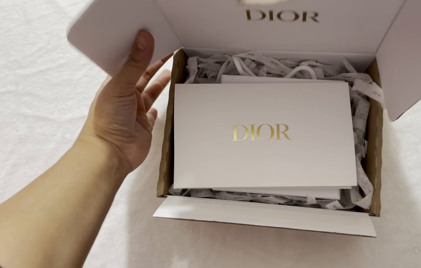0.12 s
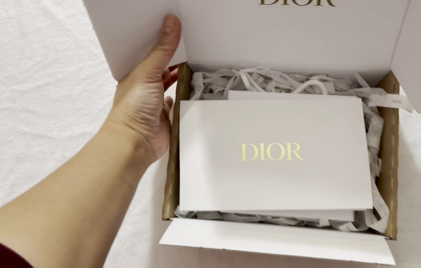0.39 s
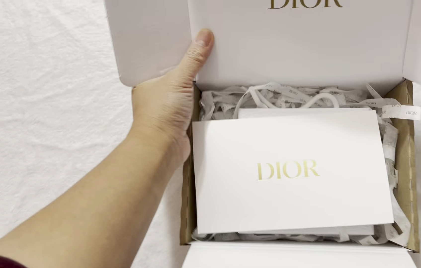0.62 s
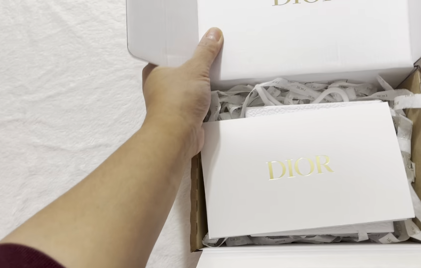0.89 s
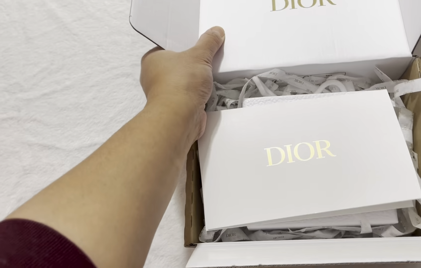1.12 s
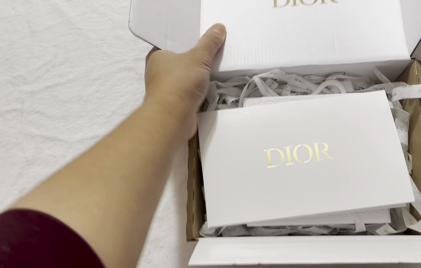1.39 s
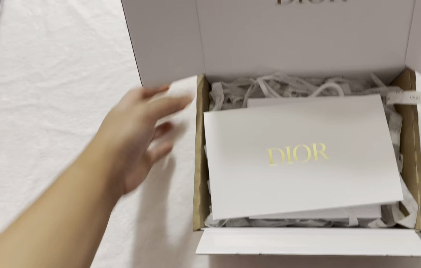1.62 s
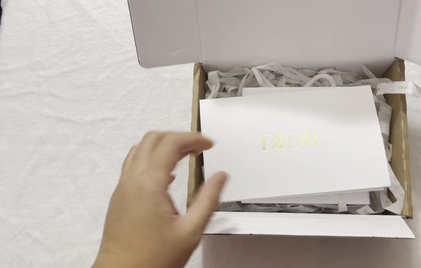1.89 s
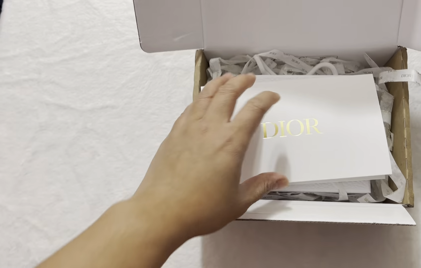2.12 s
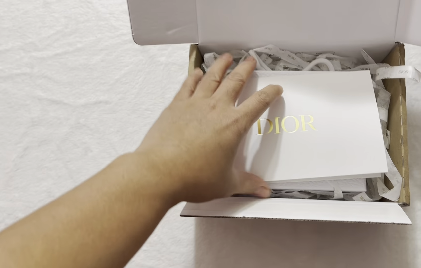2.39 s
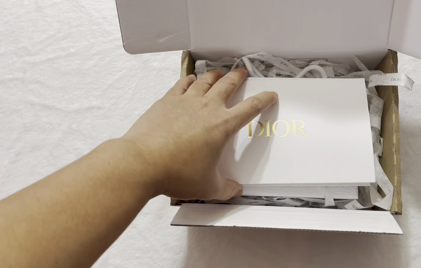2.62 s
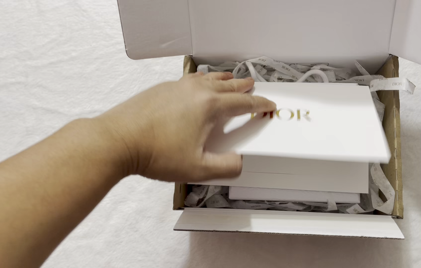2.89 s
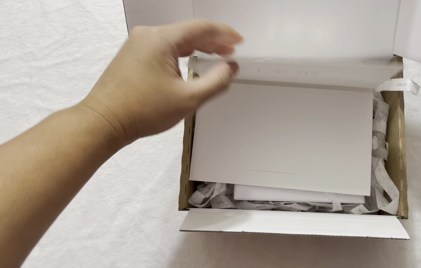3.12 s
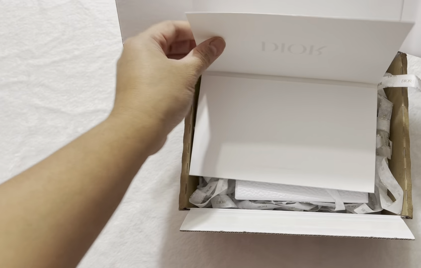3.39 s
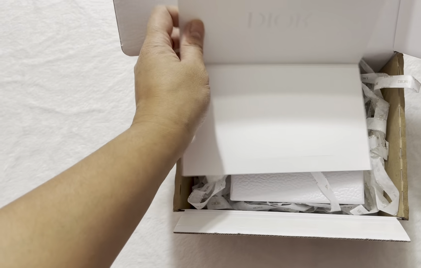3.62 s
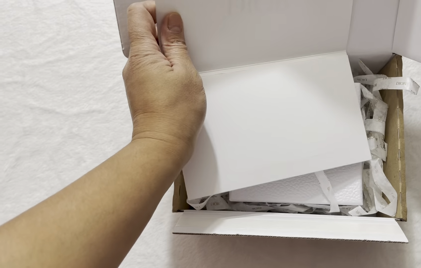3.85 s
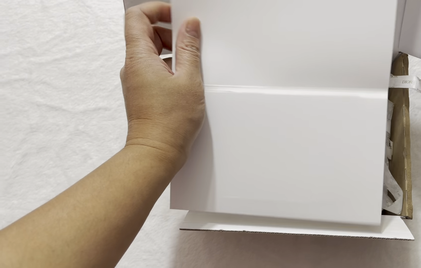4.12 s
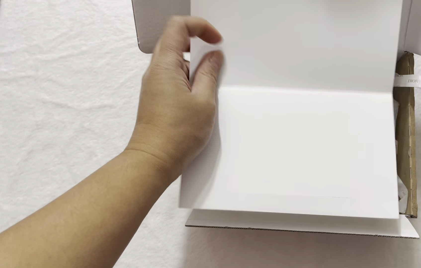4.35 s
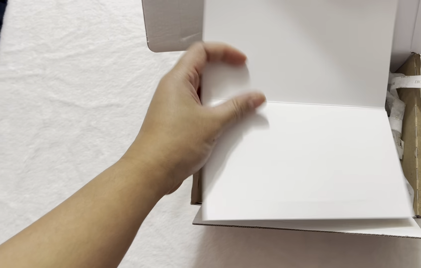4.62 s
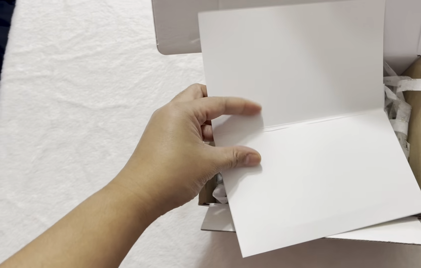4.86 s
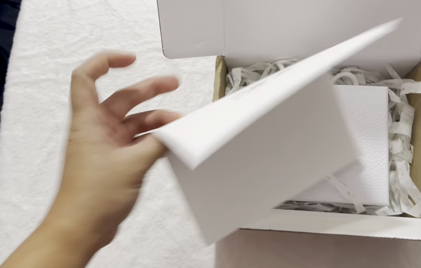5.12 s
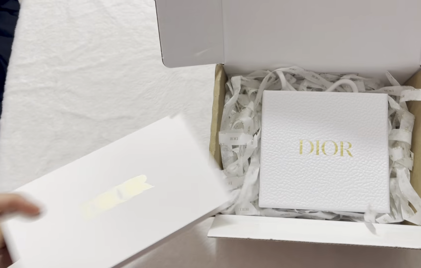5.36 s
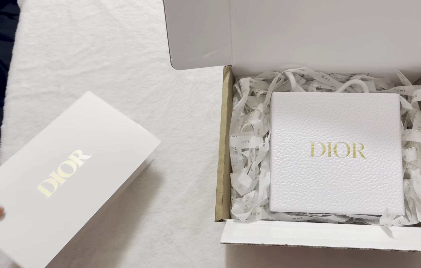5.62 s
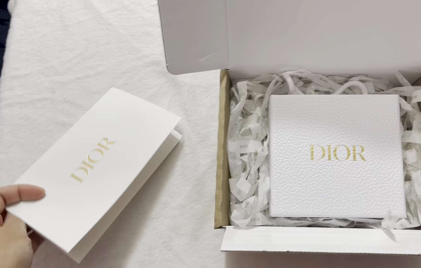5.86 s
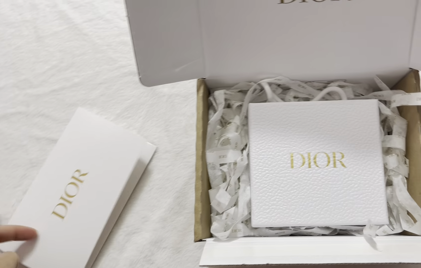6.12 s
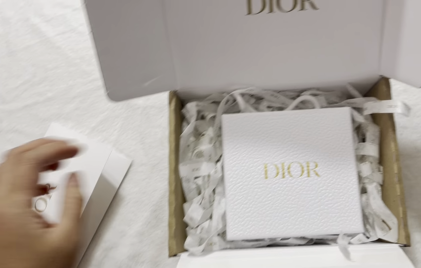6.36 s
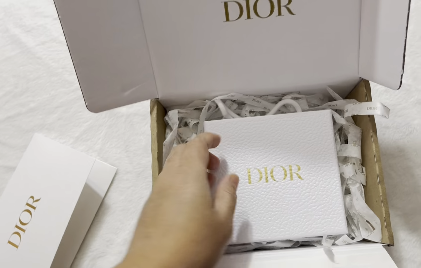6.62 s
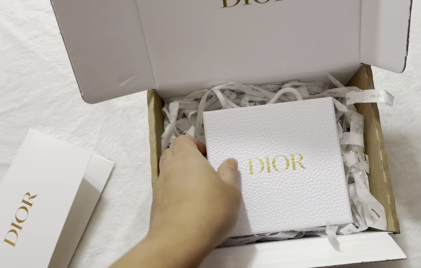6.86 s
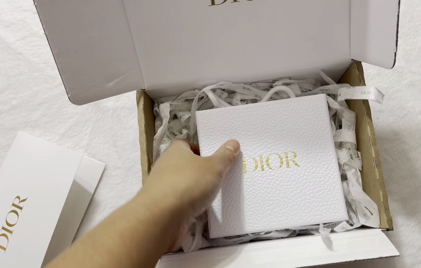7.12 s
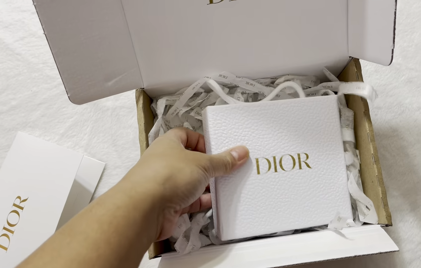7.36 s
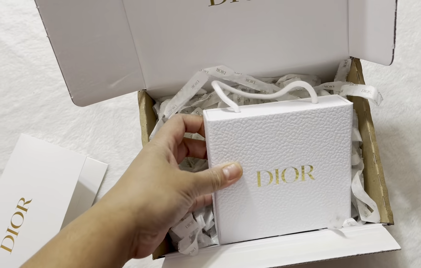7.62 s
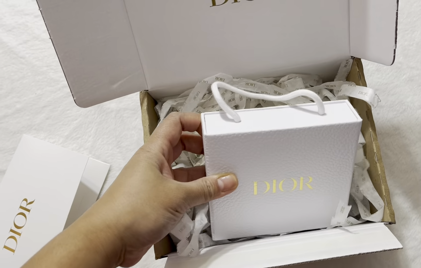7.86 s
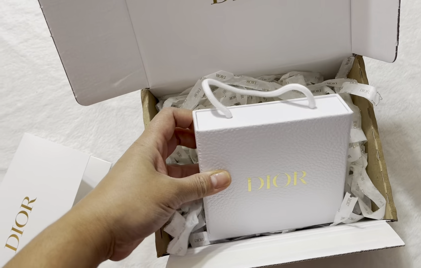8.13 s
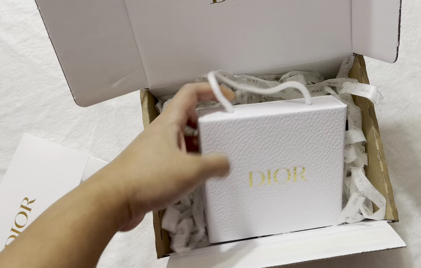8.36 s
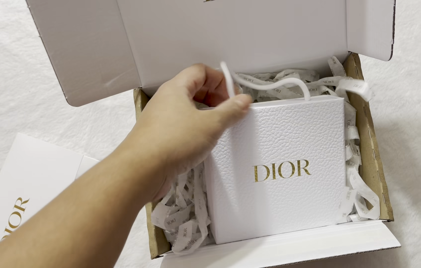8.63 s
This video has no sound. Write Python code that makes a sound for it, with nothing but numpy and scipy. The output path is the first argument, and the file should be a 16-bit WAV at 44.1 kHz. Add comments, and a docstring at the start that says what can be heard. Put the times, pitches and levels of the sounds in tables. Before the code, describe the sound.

Close stereo phone pickup in a quiet room with faint ventilation and hiss. Cardboard flaps rub, thud and creak, then fall nearly silent. A folded card slides and flexes, giving low air wafts, hollow knocks, a short squeak and bright creasing snaps. A firm double-edged tap follows as it is laid down; finally denser, crisp shredded-paper crinkles and a couple of boxy thumps accompany the lifted box.

```python
"""A hand opens a cardboard mailer: paper crinkles, board rubs and thuds, the lid creaks in its fold.
A folded card is lifted out to the left and a deep waft of air passes; knocks, a short squeak and snaps follow.
Then a small box is pulled from shredded paper, in denser crinkles and snaps, over quiet room tone.
Paper is random slips ringing small scraps or short noise bursts; board is slips or blows ringing modes;
moved air and room are filtered noise. A phone close above hears it all through two ports."""
import sys
import numpy as np
from scipy import signal
from scipy.fft import rfft, irfft, next_fast_len
from scipy.io import wavfile

SR = 44100
rng = np.random.default_rng(int(sys.argv[2]) if len(sys.argv) > 2 else 0)


def bounce(signal):
    """Save signal as a 16-bit WAV file at the path given by the first command-line argument."""
    frames = np.transpose(np.atleast_2d(signal))
    limited = np.clip(frames, -1, 1)
    pcm = np.round(limited * 32767).astype(np.int16)
    wavfile.write(sys.argv[1], SR, pcm)


def decibels_to_gain(level_db):
    """Convert a level in decibels to a linear amplitude gain (20 dB per decade)."""
    exponent = np.asarray(level_db, float) / 20
    return 10 ** exponent


N = 385425

# modes of the mailer panels: (frequency [Hz], relative level [dB], nominal decay time [s])
PANEL_MODES = [(79, -14.5, 0.054), (114, -8, 0.077), (134, -9.5, 0.064), (199, -1.5, 0.1),
               (250, -0.5, 0.12), (290.6, 7.5, 0.065), (337.2, 2.5, 0.1), (426.7, 4, 0.067),
               (489.6, -2, 0.064), (556.4, 4.5, 0.041), (645, 8, 0.016), (804, 3, 0.02), (945, -3, 0.036),
               (1032, -10, 0.056), (1300, -7.5, 0.022), (1480, -1, 0.029), (1573, -6.5, 0.038),
               (2353, -15, 0.023)]
# hand on the packaging, a slow stir under the strokes:
# (time [s], bright grain gain [dB], dull grain gain re bright [dB])
HAND_CONTACT = [(0.0, -66, -5), (0.22, -84, -3), (0.6, -60, -3), (0.92, -63, 0.5), (1.03, -67.5, -2.5),
                (1.5, -54, -4), (1.75, -78, -1.5), (2.05, -87, -1.5), (2.4, -89, 6), (2.5, -55, -4.5),
                (3.05, -82, -9), (3.24, -93, -14), (3.33, -57.5, -2.5), (3.85, -59, -2), (3.93, -75.5, 3),
                (4.5, -69.5, 6), (5.0, -52, -22.5), (5.17, -78, -3), (5.45, -70, -11), (5.68, -76, 7.5),
                (5.95, -68.5, -4), (6.14, -88, 8.5), (6.618, -94, 2), (6.632, -53, -4.5), (7.1, -44, -4),
                (7.5, -44.5, -12), (7.645, -53, -8), (8.74, -65, -15)]
# overall colour: microphone with its port resonance, and a steep cut above 13 kHz:
# (frequency [Hz], gain [dB])
OVERALL_COLOUR = [(30, -4.5), (1500, -1.5), (3500, -3), (7000, 1.5), (8000, 2.5), (9300, 7.5), (10200, 11),
                  (10800, 6), (12000, -5.5), (13000, -15.5), (13500, -36), (17000, -32.5)]


def rms_one(x):
    """Scale to unit rms."""
    return x / np.sqrt(np.mean(x ** 2) + 1e-20)


def in_time(rows):
    """Table columns interpolated to every sample; the first column is time."""
    s, *columns = np.transpose(rows)
    return [np.interp(np.arange(N) / SR, s, c) for c in columns]


def on_grid(points, size):
    """A (Hz, value) table read at every FFT bin, linear in log frequency."""
    hz, value = np.transpose(points)
    bin_hz = np.arange(size // 2 + 1) * SR / size
    return np.interp(np.log(bin_hz + 1), np.log(hz), value)


def band(x, low_hz, high_hz):
    """Butterworth band-pass."""
    return signal.sosfilt(signal.butter(2, [low_hz, high_hz], "band", fs=SR, output="sos"), x)


def drift(rate_hz):
    """Slow chance: normal points of spread 1 at the given rate, joined by lines."""
    steps = np.arange(N) * rate_hz / SR
    points = int(steps[-1]) + 2
    return np.interp(steps, np.arange(points), rng.standard_normal(points))


def ring(train, hz, t60_s):
    """Two-pole resonance: each unit click starts a decaying sine of height about 1."""
    r, w = decibels_to_gain(-60 / (t60_s * SR)), 2 * np.pi * hz / SR
    return signal.lfilter([0, np.sin(w)], [1, -2 * r * np.cos(w), r * r], train + 1e-18)


def clicks(per_s, spread_db, clump_db, clump_hz):
    """Random slips in clumps, many small and few large; per_s is the rate where the drift is zero."""
    sizes = decibels_to_gain(spread_db * np.minimum(rng.exponential(1, N), 5)) * rng.choice([-1, 1], N)
    chance = per_s * decibels_to_gain(clump_db * drift(clump_hz)) / SR
    return sizes * (rng.random(N) < chance)


def grains(train, low_hz, high_hz, cycles, count=10):
    """Each slip rings a scrap of its own size, falling 60 dB in the given cycles."""
    dealt = rng.integers(0, count, N)
    rings = np.zeros(N)
    for k, hz in enumerate(np.geomspace(low_hz, high_hz, count)):
        rings += np.sqrt(hz) * ring(train * (dealt == k), hz, cycles / hz)
    return rms_one(band(rings, 0.53 * low_hz, 1.46 * high_hz))


def bursts(times_s, gains_db, decay_ms):
    """Sudden releases: noise that swells for half the decay time and dies away."""
    t = np.arange(1500) / SR * 1000 / decay_ms
    envelope = 2 * t * np.e * np.exp(-2 * t)
    out = np.zeros(N + len(envelope))
    for s, db, noise in zip(times_s, gains_db, rng.standard_normal((len(times_s), len(envelope)))):
        out[round(s * SR):][:len(envelope)] += decibels_to_gain(db) * noise * envelope
    return out[:N]


def gestures(s, peak_db, swell_s, fade_s, under_db):
    """Gain in time: each gesture swells and fades, and its power adds to a steady part."""
    t = np.arange(0, N / SR + .002, .002)[:, None]
    before = (s - t) / np.maximum(swell_s, .005)
    after = (t - s) / np.maximum(fade_s, .005)
    away = np.where(t < s, before, after)
    # 28 dB down one swell before or one fade after the peak
    power = np.sum(decibels_to_gain(peak_db - 28 * away ** 1.22) ** 2, axis=1)
    return np.sqrt(np.interp(np.arange(N) / SR, t[:, 0], power) + decibels_to_gain(under_db) ** 2)


def paper():
    """Creases buckle as bright grains and sparser crackle; sheets and fingertips slide in duller grains."""
    # strokes: (peak time [s], bright grain gain [dB], swell [s], fade [s], dull grain gain re bright [dB])
    strokes = [(0.0, -45, .1, 0.3, -8), (0.196, -53.5, 0.82, 0.025, -3.5), (0.255, -51, 0.034, 0.048, -4.5),
               (0.37, -49.5, 0.18, 0.065, -1.5), (0.46, -45.5, 0.078, 0.24, -4.5),
               (1.107, -45.5, 0.055, 0.12, -4.5), (1.248, -43, 0.029, 0.057, -6.5),
               (1.46, -46, 0.12, 0.042, -2), (1.508, -46, 0.026, 0.17, -8.5),
               (1.869, -73, 0.12, 0.024, 0.5), (2.17, -88.5, 0.08, 0.15, 13), (2.3, -75, 0.04, 0.066, 4.5),
               (2.46, -52.5, 0.054, 0.15, -3), (2.62, -58, 0.04, 0.56, -3.5),
               (2.86, -54.5, 0.11, 0.16, -3.5), (3.07, -59, 0.33, 0.38, -8.5),
               (3.299, -56, 0.048, 0.17, -1.5), (3.42, -50.5, 0.24, 0.054, -9),
               (3.549, -45, 0.065, 0.052, -4.5), (3.62, -48.5, 0.071, 0.046, 0),
               (3.82, -54.5, 0.088, 0.15, -2), (3.97, -60, 0.028, 0.097, -5), (4.08, -55.5, 0.18, 0.15, -7),
               (4.158, -53.5, 0.047, 0.0077, -0.5), (4.25, -54.5, 0.068, 0.11, -7.5),
               (4.36, -54, 0.25, 0.085, -6), (4.43, -53.5, 0.02, 0.19, -6), (4.49, -55, 0.09, 0.032, 1),
               (4.66, -53, 0.15, 0.11, -9), (4.72, -52.5, 0.068, 0.073, -2.5),
               (4.79, -56.5, 0.091, 0.098, 5), (4.881, -47, 0.053, 0.14, 1.5),
               (5.05, -47, 0.063, 0.043, 0.5), (5.065, -34.5, 0.0069, 0.011, -6),
               (5.09, -52, 0.034, 0.12, 1), (5.23, -54, 0.051, 0.15, -6), (5.27, -45, 0.1, 0.19, -2.5),
               (5.36, -48, 0.1, 0.23, -1), (5.42, -52, 0.19, 0.093, -9), (5.511, -52.5, 0.069, 0.029, -5),
               (5.64, -66.5, 0.022, 0.08, 6), (5.815, -55.5, 0.039, 0.31, 0),
               (5.965, -51.5, 0.043, 0.061, 10.5), (6.02, -59.5, .04, 0.16, 5.5), (6.11, -66, 0.2, 0.02, 6),
               (6.673, -45, 0.048, 0.072, -3), (6.85, -38.5, 0.15, 0.19, -7.5), (7.0, -38, 0.067, 0.47, -5),
               (7.29, -35, 0.16, 0.067, -8.5), (7.5, -41.5, 0.79, 0.33, -5), (7.7, -45, 0.09, 0.37, -5),
               (7.81, -48, 0.17, 0.91, -4), (8.21, -41, 0.17, 0.058, -5), (8.45, -40, 0.62, 0.23, -5),
               (8.61, -45.5, 0.11, 0.11, -5), (8.74, -46.5, 0.092, .1, -5.5)]
    # hollow-sounding card drag, then a short squeak near 1500 Hz:
    # (peak time [s], gain [dB], swell [s], fade [s])
    drag_and_squeak = [(4.08, -64, 0.37, 0.64), (4.877, -40, 0.025, 0.012)]
    stir_db, stir_dull_db = in_time(HAND_CONTACT)
    s, db, swell_s, fade_s, dull_db = np.transpose(strokes)
    bright = gestures(s, db, swell_s, fade_s, stir_db)
    dull = gestures(s, db + dull_db, swell_s, fade_s, stir_db + stir_dull_db)

    crinkle = grains(clicks(6000, 2.0, clump_db=4.0, clump_hz=130), 5390, 13770, cycles=8.4)
    crackle = grains(clicks(350, 4.8, clump_db=5.0, clump_hz=27), 3500, 8800, cycles=4.0)
    slide = grains(clicks(4000, 3.1, clump_db=1.5, clump_hz=60), 2075, 4800, cycles=7.7)
    finger = grains(clicks(2500, 1.5, clump_db=5.5, clump_hz=54), 1180, 2330, cycles=4.6)
    open_hollow = rms_one(ring(finger, 1540, 0.051))   # the open box rings along
    broad_ring = rms_one(ring(finger, 1500, .009))
    finger = rms_one(finger + decibels_to_gain(-7.5) * open_hollow)

    out = bright * (decibels_to_gain(-0.92) * crinkle + decibels_to_gain(-13.0) * crackle)
    out += dull * (decibels_to_gain(2.0) * slide + decibels_to_gain(-2.5) * finger)
    return out + gestures(*np.transpose(drag_and_squeak), -130) * broad_ring


def snaps():
    """A crease lets go at once: a bright tick, a weaker one off the box wall, a duller part from larger sheets."""
    # (time [s], tick gain before trim [dB], dull gain re tick before trim [dB])
    crease_releases = [(1.3755, -34, -11.5), (2.45, -33, -6), (2.459, -31, -13), (2.467, -28.5, -13.5),
                       (2.401, -60, 3), (3.807, -34, -3.5), (3.4257, -31, -28), (4.3393, -30.5, -22),
                       (4.4096, -29.5, -5.5), (4.684, -26.5, -9), (4.9895, -33, -12), (5.038, -29, -18),
                       (5.181, -50, -2), (5.0638, -13, -18.5), (5.2014, -27, -9.5), (5.2655, -29, -5),
                       (5.3384, -31.5, -2), (5.42, -26, -9), (5.4494, -26, -30), (5.9636, -22.5, -1),
                       (5.982, -37.5, 3.5), (5.949, -45, 5), (6.8193, -21, -17), (6.859, -27, -16.5),
                       (6.8974, -30, -4.5), (6.9788, -29, -24), (7.005, -37, -19), (7.0532, -23.5, -6),
                       (7.079, -23.5, -9), (7.237, -25, -11), (7.2902, -25, -5.5), (7.344, -28, -18),
                       (7.362, -26.5, -2.5), (7.379, -25, -12), (8.322, -33, -3), (7.736, -27, -20),
                       (7.8062, -23.5, -21), (8.213, -30, -4), (8.5954, -32.5, -6), (8.6465, -28.5, -9.5)]
    s, db, dull_db = np.transpose(crease_releases)
    tick = bursts(s, db - 1.5, 0.55) + bursts(s + 0.0027, db - 14, 0.6)
    bright = band(band(tick, 4100, 10500), 3300, 13000)
    dull = band(bursts(s, db + dull_db + 6.0, 2.0), 1200, 4500)
    return bright + dull


def struck_panels(centre_hz, chance):
    """Modes near a centre pitch, detuned a little by the grip; low modes take longer to start."""
    t = np.arange(12000) / SR
    hz, mode_db, decay_s = np.transpose(PANEL_MODES)[:, :, None]
    strength, phase, detune = chance
    near_db = -24 * np.abs(np.log2(hz / centre_hz))   # 24 dB per octave
    fall_db = 66 * t / decay_s
    swell = (1 - np.exp(-t * hz / 0.7)) ** 2   # time constant 0.7 cycles
    modes = decibels_to_gain(mode_db + near_db + 5.4 * strength - fall_db) * swell
    detuned_hz = hz * (1 + 0.067 * (detune - .5))
    return np.sum(modes * np.sin(2 * np.pi * detuned_hz * t + 1.94 * phase), axis=0)


def thuds():
    """A blow gives a noise crack, a knock from small panels and a thump from large ones."""
    # (time [s], knock peak [dB], knock centre [Hz], thump rms over its first 25 ms [dB], thump centre [Hz])
    blows = [(0.026, -40.5, 1460, -38, 199), (0.314, -48, 714, -37.5, 129), (0.332, -45, 560, -41.5, 264),
             (0.452, -39, 859, -45, 274), (0.66, -49, 580, -49, 253), (0.901, -40, 980, -53, 500),
             (0.919, -38, 960, -57, 560), (3.085, -34.5, 556, -39.5, 209), (3.295, -37.5, 1150, -60, 390),
             (3.546, -37, 590, -43.5, 88.8), (3.624, -34.5, 1060, -47, 110), (3.807, -32, 840, -76, 498),
             (4.154, -46, 1020, -60, 400), (4.337, -36, 900, -59, 463), (4.41, -27, 664, -43.5, 340),
             (4.45, -25.5, 680, -46, 397), (4.685, -23, 1380, -26, 487), (4.729, -38, 1280, -32, 433),
             (4.783, -29, 1440, -35.5, 474), (4.905, -32, 480, -39.5, 129), (4.941, -39.5, 624, -44, 300),
             (5.064, -31.5, 825, -36.5, 185), (5.103, -39.5, 796, -37, 173), (5.181, -39, 620, -51, 199),
             (5.201, -33, 1280, -36.5, 198), (5.267, -22, 470, -23, 200), (5.339, -35.5, 1280, -41.5, 450),
             (5.421, -36, 870, -40.5, 91.5), (5.507, -48, 851, -36.5, 93.5), (5.812, -52, 620, -50, 250),
             (5.972, -22.5, 815, -36, 414), (5.981, -25.5, 940, -33.5, 335),
             (5.985, -16.5, 945, -40.5, 299), (6.626, -52, 1400, -47, 450), (6.636, -49, 1480, -46, 380),
             (6.672, -50, 860, -41, 480), (6.689, -45, 860, -45.5, 364), (6.719, -56, 678, -45, 430),
             (6.742, -51, 900, -51, 497), (6.756, -48, 641, -50, 400), (6.897, -32.5, 795, -75, 455),
             (6.994, -30, 814, -74, 447), (7.468, -30.5, 615, -37.5, 332), (8.2, -27, 1090, -30, 290),
             (8.203, -23, 554, -39.5, 90), (8.609, -39, 894, -42, 396)]
    out = np.zeros(N + SR)
    chances = rng.random((len(blows), 3, len(PANEL_MODES), 1))
    for (s, knock_db, knock_hz, thump_db, thump_hz), chance in zip(blows, chances):
        knock = struck_panels(knock_hz, chance)
        thump = struck_panels(thump_hz, chance)
        blow = decibels_to_gain(knock_db) * knock / np.max(np.abs(knock))
        blow += decibels_to_gain(thump_db) * thump / np.std(thump[:1100])
        crack = bursts([0], [knock_db + 4.5], decay_ms=1.2)[:len(blow)]
        crack = band(crack, 0.77 * knock_hz, 2.3 * knock_hz)
        blow += band(crack, .5 * knock_hz, 2.8 * knock_hz)
        out[round(s * SR):][:len(blow)] += blow
    return out[:N]


def rubbed_board():
    """Dense slips shake the panels: edge rub sounds the higher modes, flex the lower ones."""
    # (peak time [s], edge rub gain [dB], swell [s], fade [s], panel flex gain re rub [dB])
    rubs = [(0.0, -45, .1, 0.048, 2), (0.15, -48, 0.66, 0.11, -3), (0.289, -57.5, 0.05, 0.018, 14.5),
            (0.389, -43, 0.19, 0.033, 1), (0.49, -44, 0.18, 0.11, 2.5), (0.57, -55.5, 0.13, 0.16, 7),
            (0.67, -49, 0.08, 0.19, -1.5), (0.85, -48.5, 0.21, 0.23, -14), (0.915, -43.5, 0.13, 0.026, -28),
            (1.14, -48.5, 0.18, 0.093, -23), (1.34, -58.5, 0.51, 0.85, -3.5),
            (1.38, -49.5, 0.059, 0.048, 0), (1.53, -55.5, 0.48, 0.17, -12), (2.56, -60, 0.24, 0.51, -13),
            (2.69, -65, 0.4, 0.8, 2), (3.31, -56, 0.069, 0.56, 3), (3.48, -68, 0.11, 0.84, 16.5),
            (3.87, -63, 0.061, 0.032, 12), (3.98, -62.5, 0.028, 0.2, -15), (4.45, -49, 0.12, 0.21, -14),
            (4.56, -62, 0.17, 0.32, 6), (4.79, -39.5, 0.15, 0.067, -1), (4.82, -60, .05, .09, 11.5),
            (4.92, -47, 0.19, 0.23, 4), (5.05, -55, 0.15, 0.24, 16.5), (5.28, -38, 0.099, 0.15, -9),
            (5.33, -42.5, 0.24, 0.04, -1), (5.401, -47, 0.015, 0.22, -2.5), (5.99, -47, 0.06, 0.13, -24),
            (6.64, -59, 0.013, 0.41, -10), (6.79, -51, 0.18, 0.42, -20), (6.92, -51, 0.27, 0.68, -32),
            (7.42, -54.5, 0.44, 0.36, -31), (7.65, -51.5, 0.34, 0.72, -7), (8.3, -53, 0.18, 0.25, -3),
            (8.5, -48.5, 0.75, 0.36, -34), (8.74, -48.5, 0.072, .1, -1)]
    s, db, swell_s, fade_s, flex_db = np.transpose(rubs)
    rub_gain = gestures(s, db, swell_s, fade_s, in_time(HAND_CONTACT)[0] - 4.5)
    flex_gain = gestures(s, db + flex_db, swell_s, fade_s, -74.0)
    slips = [clicks(1500, 3.4, clump_db=5.5, clump_hz=40) for side in range(2)]
    out = np.zeros(N)
    for gain, low_hz, high_hz in [(rub_gain, 450, 1100), (flex_gain, 130, 450)]:
        rings = np.zeros(N)
        for k, (hz, mode_db, decay_s) in enumerate(PANEL_MODES):
            if low_hz <= hz < high_hz:   # rubbed modes fall 60 dB in half the nominal time
                rings += decibels_to_gain(mode_db) * rms_one(ring(slips[k % 2], hz, .5 * decay_s))
        out += gain * rms_one(band(rings, .5 * low_hz, high_hz))
    return out


def moved_air():
    """Flaps, card and box push air: low noise in puffs, deeper when a whole card or box swings."""
    # pushes of flaps, card and box: (peak time [s], gain before flutter [dB], swell [s], fade [s])
    puffs = [(0.039, -35, 0.022, 0.031), (0.39, -39.5, 0.11, 0.064), (0.49, -42, 0.076, 0.064),
             (0.87, -53.5, 0.22, 0.33), (1.14, -51.5, 0.11, 0.11), (1.46, -50.5, 0.26, .06),
             (3.14, -53, 0.05, .08), (3.49, -39, 0.054, 0.11), (3.57, -44, .1, 0.3), (3.7, -55, 0.14, 0.18),
             (4.45, -44, 0.085, 0.1), (4.92, -47, .06, 0.18), (5.09, -38.5, .06, 0.24),
             (5.29, -45, .09, .15), (5.38, -40, 0.24, 0.023), (5.5, -48, 0.14, 0.17),
             (5.74, -50, 0.22, 0.2), (5.992, -39, 0.051, 0.093), (6.859, -48, 0.12, .04),
             (7.49, -46, 0.026, 0.11), (8.229, -39, 0.037, 0.077), (8.635, -46, 0.1, 0.061)]
    # swings of the whole card or box: (peak time [s], level [dB], swell [s], fade [s])
    wafts = [(3.5, -45, 0.1, 0.45), (4.15, -64, 0.4, 0.4), (8.6, -61, 0.27, 0.3)]
    puff_gain = gestures(*np.transpose(puffs), in_time(HAND_CONTACT)[0] - 16)
    puff_gain *= decibels_to_gain(3.8 * drift(12))
    puff = rms_one(band(band(rng.standard_normal(N), 60, 153), 23, 180))
    waft = rms_one(band(rng.standard_normal(N), 24, 52))
    return puff_gain * puff + gestures(*np.transpose(wafts), -91.0) * waft


def creak():
    """As the thumb lets go, nearly regular, quickening slips in the fold ring the lid."""
    # (peak time [s], level [dB], swell [s], fade [s])
    fold_creaks = [(1.45, -43.5, 0.045, 0.084), (1.49, -44.5, 0.077, 0.069)]
    # lid resonances: (frequency [Hz], width [Hz] (t60 = 2 / width), relative level [dB])
    lid_modes = [(263, 38, 0.5), (1056, 45, 1.5), (1483, 47, -6), (2240, 60, -4.5), (2400, 25, -3)]
    # mean slip rate: 258.2 Hz at the first peak, rising 180 Hz per second
    rate_hz = 258.2 + 180 * (np.arange(N) / SR - fold_creaks[0][0])
    turns = np.cumsum(rate_hz * (1 + 0.1264 * drift(150))) / SR
    slips = (np.diff(np.floor(turns), prepend=0) > 0) * decibels_to_gain(2.1 * drift(120))
    span = slice(SR, 2 * SR)   # the second in which the lid is let go
    rings = sum(decibels_to_gain(db) * rms_one(ring(slips[span], hz, 2.0 / width_hz)) for hz, width_hz, db in lid_modes)
    out = np.zeros(N)
    out[span] = rms_one(rings)
    return gestures(*np.transpose(fold_creaks), -130) * out


def room_tone(size):
    """Ventilation and microphone hiss: shaped noise, partly unrelated in the two ports."""
    # spectrum as heard after the overall colour: (frequency [Hz], relative density [dB per Hz])
    room_spectrum = [(18, -40.5), (30, -9), (68, -6), (102, -17.5), (165, -23), (207, -24.5), (600, -34),
                     (900, -31.5), (1150, -46), (1550, -37.5), (2030, -50), (8880, -58), (13000, -61)]
    white = rng.standard_normal((3, size))
    spectrum = rfft(white[:2] + 1.1 * white[2])
    shape = decibels_to_gain(on_grid(room_spectrum, size) - on_grid(OVERALL_COLOUR, size))
    return decibels_to_gain(-63) * rms_one(irfft(spectrum * shape)[:, :N])   # rms ahead of the overall colour


def scatter_paths(near, size):
    """Sound off box walls, hand and phone: drifting shares of short decaying noise paths to each port."""
    shares = np.array([drift(30) for place in range(6)])   # paths change as hand and phone move
    shares /= np.linalg.norm(shares, axis=0)
    paths = rng.standard_normal((6, 2, 2000)) * np.exp(-np.arange(2000) / SR / 0.0059)
    paths /= np.linalg.norm(paths, axis=2, keepdims=True)
    return sum(rfft(near * share, size) * rfft(path, size) for share, path in zip(shares, paths))


def scene():
    """Direct sound is common to both ports, scatter is not; sound from beside the box leads at the left."""
    # (frequency [Hz], power share common to both ports)
    common_share = [(60, .94), (400, .96), (1500, .9), (2500, .65), (3300, .3), (4200, .65), (5200, .5),
                    (6100, .75), (7000, .45), (7900, .93), (10200, .99), (11400, .87), (12000, .99),
                    (12900, .6)]
    # card held or laid to the left of the box: (time [s], share of the sound from there)
    aside_share = [(3.84, 0.049), (3.9, 0.52), (4.3, 0.68), (4.38, 0.017), (5.42, 0.13), (5.55, 1),
                   (6.3, 0.77), (6.5, 0.048)]
    # further left-port lead for that sound: (frequency [Hz], phase [rad])
    aside_lead = [(200, 0), (1000, .6), (1700, 1.7), (2400, 2.7), (3000, 3.7), (3800, 6.28)]
    size = next_fast_len(N + SR)
    near = paper() + snaps() + thuds() + rubbed_board() + moved_air() + creak()
    common = np.clip(on_grid(common_share, size), 0, 1)
    direct = np.sqrt(common) * rfft(near, size)
    scatter = np.sqrt(1 - common) * scatter_paths(near, size)
    heard = irfft(direct + scatter, size)[:, :N]
    aside = np.clip(in_time(aside_share)[0], 0, 1) * heard
    turn = np.exp(1j * on_grid(aside_lead, size) * [[1], [0]])
    turned = irfft(rfft(aside, size) * turn, size)[:, :N]
    return heard - aside + turned + room_tone(size)


def top_cut(x):
    """Nothing passes above the cut-off."""
    return signal.sosfilt(signal.butter(12, 17020, fs=SR, output="sos"), x)


def record(dry):
    """Two ports share one overall colour, with a small balance and a phase offset that turns with frequency."""
    # (frequency [Hz], left minus right [dB])
    port_balance = [(60, 0), (180, -3.5), (550, 0), (1650, -1.5), (4970, 2.5), (15000, -1.5)]
    # (frequency [Hz], phase by which the left port leads [rad])
    port_lead = [(1900, .1), (2400, 1), (2800, 1.7), (3150, 1.9), (3600, .15), (6500, .3), (7700, 1.05),
                 (8600, -.05), (10280, -3.14), (11750, -6.28), (12700, -6.4), (13200, -9.4)]
    size = next_fast_len(N + SR)
    sides = np.array([[1], [-1]])   # half of each difference goes to each port
    gain = decibels_to_gain(on_grid(OVERALL_COLOUR, size) + .5 * on_grid(port_balance, size) * sides)
    phase = np.exp(.5j * on_grid(port_lead, size) * sides)
    mix = irfft(rfft(dry, size) * gain * phase, size)[:, :N]
    return top_cut(mix)


dry = scene()
out = record(dry)
bounce(out)
```